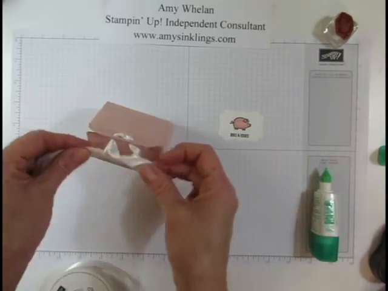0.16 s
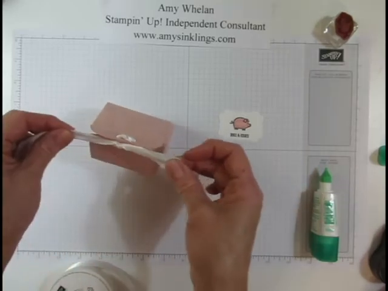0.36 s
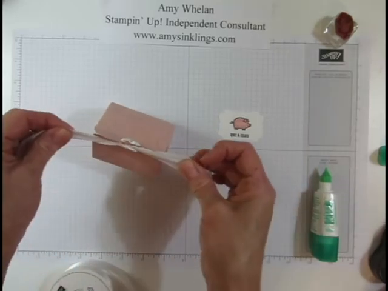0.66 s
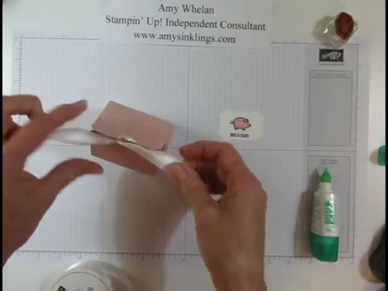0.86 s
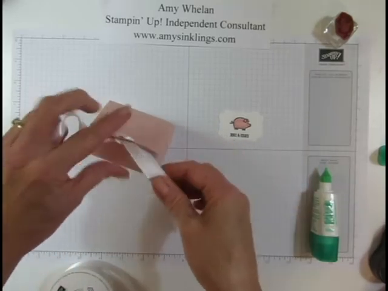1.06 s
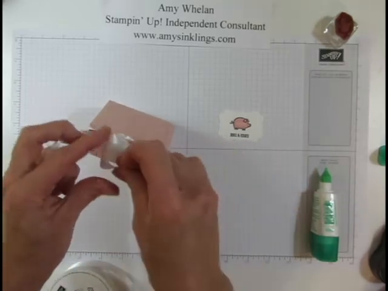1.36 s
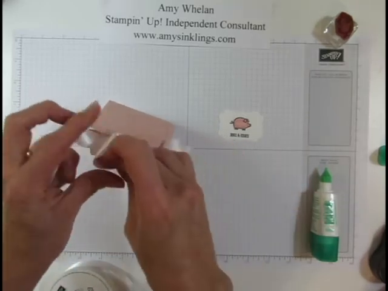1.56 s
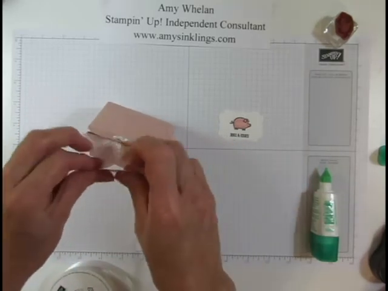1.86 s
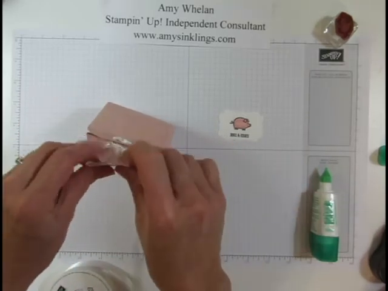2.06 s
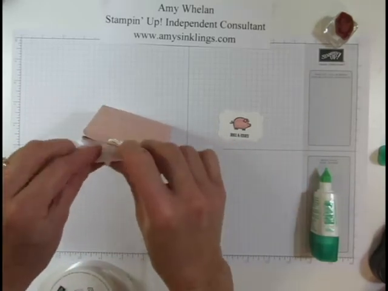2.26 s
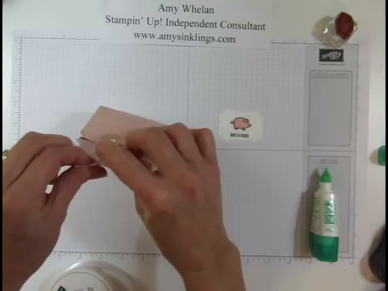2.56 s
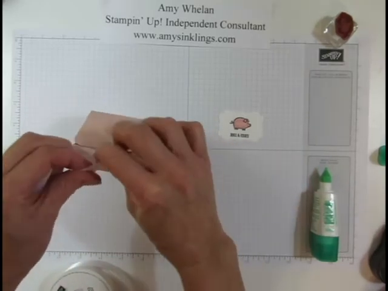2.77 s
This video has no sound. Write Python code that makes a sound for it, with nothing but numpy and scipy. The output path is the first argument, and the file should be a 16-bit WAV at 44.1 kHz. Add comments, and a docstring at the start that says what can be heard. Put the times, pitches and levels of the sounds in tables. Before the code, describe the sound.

Ribbon being tied round a small cardstock box: soft brushing, crisp ticks, low room hum

```python
"""Ribbon tied round a small box

At a desk in a room, close under a camera's microphone, hands tie a satin ribbon round a cardstock box.
The ribbon brushes and rasps: grains and noise swell with each stroke and ring card and satin.
Fingers knock and tick: short bursts of noise ring the modes of the box.
Behind, a mains hum beats twice a second against a motor tone, summed from steady cosines;
the steady hiss of the room is noise shaped in the middle and at the sides."""
import sys
import numpy as np
from scipy import signal
from scipy.fft import rfft, irfft
from scipy.io import wavfile
from scipy.ndimage import uniform_filter1d

SR = 44100
rng = np.random.default_rng(int(sys.argv[2]) if len(sys.argv) > 2 else 0)


def ratio_of_db(decibels):
    """Turn decibels (scalar or array-like) into linear amplitude factors; 0 dB maps to 1."""
    return 10 ** (np.asarray(decibels, float) / 20)


def dump(signal):
    """Clip the signal to [-1, 1] and save it as 16-bit WAV at the path in sys.argv[1]."""
    limited = np.clip(np.atleast_2d(signal).T, -1, 1)
    pcm = np.round(limited * 32767).astype(np.int16)
    wavfile.write(sys.argv[1], SR, pcm)


N = 127890  # length in samples

# Strokes of ribbon or finger: (start [s], rise [s], hold [s], card boom [dB], rasp [dB], satin hiss [dB])
STROKES = [(0.087, 0.026, 0.063, -59, -50.5, -49.5), (0.181, 0.0058, .006, -60, -48, -46),
           (.17, .12, 0.061, -52.5, -46, -52), (0.367, 0.054, 0.033, -49.5, -42, -43.5),
           (0.461, 0.0092, 0.0066, -48.5, -46, -46), (0.464, 0.025, 0.036, -51, -48.5, -60),
           (0.574, .006, 0.023, -60, -52, -54), (.662, 0.0072, .022, -44.5, -46.5, -50),
           (.768, 0.0034, 0.0086, -47, -44.5, -48.5), (.79, .005, .01, -63, -49, -59),
           (0.816, 0.0055, .008, -56, -45.5, -52), (.837, .008, 0.01, -44, -35, -32.5),
           (0.855, 0.0041, 0.03, -48, -47, -46), (0.917, 0.0046, 0.013, -55, -54, -54),
           (0.995, 0.0026, 0.013, -51, -47, -55), (1.076, 0.0026, 0.0067, -50, -45, -54),
           (1.089, 0.0047, .008, -43.5, -44.5, -46), (1.251, 0.011, 0.022, -54, -54, -55.5),
           (1.296, 0.036, 0.048, -53.5, -52.5, -50.5), (1.567, 0.028, 0.018, -68, -54.5, -53.5),
           (1.735, 0.0052, 0.022, -58, -56.5, -51), (2.038, 0.02, 0.022, -56, -60, -53),
           (2.115, .015, 0.015, -62, -60, -58), (2.313, 0.0032, 0.03, -36.5, -36.5, -42),
           (2.328, .012, 0.0014, -34, -31.5, -34), (2.349, 0.0058, 0.023, -42.5, -50, -50),
           (2.458, 0.0027, 0.019, -53.5, -50, -67), (2.537, 0.0054, 0.0097, -45.5, -40, -44.5),
           (2.612, 0.01, 0.027, -44, -47, -56), (2.663, .008, 0.036, -47.5, -50, -54),
           (2.718, .004, 0.026, -42.5, -45.5, -54), (2.763, 0.0083, 0.031, -45.5, -42, -48.5),
           (2.801, 0.0018, 0.0085, -36, -34, -30.5), (2.809, 0.0063, 0.018, -41, -49, -52),
           (2.829, .01, .04, -48, -54, -54), (2.882, .008, .02, -64, -44, -51)]
# Resonances of each part of a stroke: (frequency [Hz], width [Hz], relative level [dB])
CARD_BOOM = [(450, 174, 1.5), (650, 205, -2.5), (980, 210, -3.5), (1265, 350, 4.5)]
CARD_RASP = [(2170, 590, 1.5), (2810, 570, 4), (3630, 1340, 0.5), (4176, 900, 4.5), (5500, 1900, -5)]
SATIN_HISS = [(6670, 3650, 0.5), (8900, 5100, 0.5), (10200, 4700, 1)]
# Knocks and ticks on the box, before the room:
# (time [s], peak [dB], favoured pitch [Hz], loss one octave away [dB], its sign ignored)
KNOCKS = [(0.187, -37.5, 5030, 17), (0.313, -33, 3800, 19), (.325, -39, 5000, 12), (0.466, -29.5, 8000, 9),
          (.771, -41, 2200, 1), (.779, -38, 2700, 14), (0.826, -35, 5500, 13), (.837, -16, 4470, 29),
          (.845, -23, 9000, 13), (0.851, -24.5, 4340, 14), (.93, -32.5, 2300, 17), (1.0, -32.5, 2900, 4),
          (1.083, -35, 2700, 8), (1.097, -32, 650, 15), (1.099, -34, 2700, -4), (2.3042, -18, 760, 9),
          (2.322, -30, 450, 9), (2.343, -20, 2780, 16), (2.461, -31, 500, 13), (2.542, -36, 3000, 2),
          (2.615, -31.5, 497, 18), (2.647, -31.5, 1250, 6), (2.723, -40, 2200, 5), (2.803, -16, 1020, 1.5),
          (2.808, -10.5, 2500, 3.5), (2.814, -18, 1260, 13), (2.825, -30, 1100, 7), (2.856, -34, 800, 24)]
# Modes of the box, before scatter: (frequency [Hz], relative level [dB], time to fall 60 dB [s])
BOX_MODES = [(240, -12, .05), (410, -4, .06), (620, -1, .05), (800, 0, .09), (980, -1, .035),
             (1250, 0, .055), (1700, -8, .02), (2250, 0, .028), (2750, 0, .022), (3600, -1, .016),
             (4200, 0, .018), (5600, -3, .012), (6400, -4, .012), (8300, -4, .01), (10000, -6, .008)]
# Stereo width of the near sounds: (frequency [Hz], side minus mid [dB])
NEAR_WIDTH = [(60, -32), (300, -3), (1000, -18), (2500, -20.5), (4000, -16.5), (7500, -6.5), (13000, -1.5)]
# Steady tones, one entry each: (frequency [Hz])
HUM_HZ = [119.99, 117.99, 235.85, 87.06, 174.03, 52.4]
# The same tones in order: (mid rms [dB], side minus mid [dB])
HUM_LEVELS = [(-43, -36), (-51.5, -28), (-60.5, -6), (-62, -18), (-61.5, -12), (-63.5, -23)]
# Spectral shape of the room hiss, middle then sides: (frequency [Hz], relative level [dB])
HISS_MID_SHAPE = [(12, -56), (30, -13), (52, -1), (70, -4.5), (150, -2), (200, -7.5), (300, -8),
                  (600, -11.5), (1200, -13), (1700, -15.5), (2800, -16), (6000, -21.5), (9000, -27),
                  (12000, -32.5), (14000, -49)]
HISS_SIDE_SHAPE = [(12, -58), (30, -30), (100, -5), (200, -2.5), (400, -3.5), (650, -7.5), (1440, -17),
                   (3000, -24), (5500, -27), (9000, -30), (12000, -35), (14000, -48)]

GRAINS_PER_S, GRAIN_SPREAD_DB = 2500, 3.8
SMOOTH_SHARE = .4  # share of the stroke drive's power that is smooth noise
FADE_S = 0.015  # a stroke dies by 20 dB in this time
MODE_SCATTER_DB, MODE_DETUNE = 2., .015  # chance spread of each mode's level and (as a fraction) pitch
CONTACT_S = .0008  # time in which the contact rattle falls to 1/e
RING_SAMPLES = 4000
BASS_CUT_HZ = 193  # the small box radiates no deep bass
ROOM_T60_S, ROOM_DB = 0.28, -16.5
SIDE_T60_S = .03
ECHO_DULL_HZ = 9000
BEAT_TOP_S = .2  # the two strongest tones first add up here
HISS_MID_DB, HISS_SIDE_DB = -46.5, -45.5  # rms
MIC_EDGE_HZ = 13700


def read(points, hz):
    """Value of a (Hz, value) table on a log-frequency axis."""
    f, value = np.transpose(points)
    return np.interp(np.log(hz + 1), np.log(f + 1), value)


def evened(x):
    """Scales to rms 1."""
    return x / np.sqrt(np.mean(x ** 2) + 1e-20)


def coloured(x, points):
    """Filters x by a (Hz, dB) table."""
    gain = ratio_of_db(read(points, np.fft.rfftfreq(N, 1 / SR)))
    return irfft(rfft(x) * gain, N)


def resonate(x, peaks):
    """Sum of resonances, each applied twice for steep skirts, with alternating sign."""
    out = 0
    for k, (hz, width, db) in enumerate(peaks):
        b, a = signal.iirpeak(hz, hz / width, SR)
        twice = signal.lfilter(b, a, signal.lfilter(b, a, x))
        out = out + (-1) ** k * ratio_of_db(db) * twice
    return out


def strokes():
    """Fibres catch and slip: dense grains plus smooth noise, swelling with each stroke, ring card and satin."""
    t = np.arange(N) / SR
    power = np.zeros((3, N))  # boom, rasp and satin hiss
    for start, rise, hold, *levels_db in STROKES:
        since = t - start
        fade = ratio_of_db(-20 * np.clip(since - rise - hold, 0, None) / FADE_S)
        shape = np.clip(since / rise, 0, 1) * fade
        power += (ratio_of_db(np.array(levels_db))[:, None] * shape) ** 2

    size = ratio_of_db(GRAIN_SPREAD_DB * np.minimum(rng.exponential(1, N), 4))
    size = size * rng.choice([-1., 1.], N)
    grains = evened(size * (rng.random(N) < GRAINS_PER_S / SR))
    smooth = rng.standard_normal((3, N))
    # the three parts share their grains but not their smooth noise
    drive = np.sqrt(1 - SMOOTH_SHARE) * grains + np.sqrt(SMOOTH_SHARE) * smooth

    out = np.zeros(N)
    for peaks, d, swell in zip((CARD_BOOM, CARD_RASP, SATIN_HISS), drive, np.sqrt(power)):
        out += resonate(d * swell, peaks) / np.std(resonate(d, peaks))
    return out


def knocks():
    """Each blow is a short rattle of contact that rings the modes of the box nearest its own pitch."""
    out = np.zeros(N + RING_SAMPLES)
    t = np.arange(RING_SAMPLES) / SR
    mode_hz, mode_db, t60 = np.transpose(BOX_MODES)[:, :, None]
    chances = rng.standard_normal((len(KNOCKS), len(BOX_MODES), 1))
    rattles = rng.standard_normal((len(KNOCKS), RING_SAMPLES)) * np.exp(-t / CONTACT_S)
    bass_cut = signal.butter(2, BASS_CUT_HZ, "high", fs=SR)
    for (start, peak_db, pitch_hz, loss_db), chance, rattle in zip(KNOCKS, chances, rattles):
        octaves = np.log2(mode_hz / pitch_hz)
        level_db = mode_db - abs(loss_db) * octaves ** 2 + MODE_SCATTER_DB * chance
        # the same draws in reverse order shift the pitches
        struck_hz = mode_hz * (1 + MODE_DETUNE * chance[::-1])
        modes = ratio_of_db(level_db - 60 * t / t60) * np.sin(2 * np.pi * struck_hz * t)
        ring = signal.fftconvolve(modes.sum(0), rattle)[:RING_SAMPLES]
        ring = signal.lfilter(*bass_cut, ring)
        out[round(start * SR):][:RING_SAMPLES] += ratio_of_db(peak_db) * ring / abs(ring).max()
    return out[:N]


def echoes(x, t60):
    """Reflections as dense dying random taps of energy 1, dulled in the treble."""
    t = np.arange(SR // 2) / SR
    taps = rng.standard_normal(len(t)) * (t > .0003) * ratio_of_db(-60 * t / t60)
    taps = signal.lfilter(*signal.butter(1, ECHO_DULL_HZ, fs=SR), taps)
    return signal.fftconvolve(x, taps / np.linalg.norm(taps))[:N]


def hum():
    """Steady mains and motor tones, stronger in mid than side; close pitches beat. Returns mid and side."""
    t = np.arange(N) / SR - BEAT_TOP_S
    tones = np.sqrt(2) * np.cos(2 * np.pi * np.outer(HUM_HZ, t))  # each of rms 1
    mid_db, side_db = np.transpose(HUM_LEVELS)
    return np.array([ratio_of_db(mid_db) @ tones, ratio_of_db(mid_db + side_db) @ tones])


def hiss():
    """Smooth room noise with faint drifting patches in time and pitch; returns mid and side."""
    frames = dict(nperseg=1024, noverlap=768)
    _, _, z = signal.stft(rng.standard_normal((2, N)), SR, **frames)
    patches = uniform_filter1d(rng.standard_normal(z.shape[1:]), 12, 0)  # over frequency
    patches = evened(uniform_filter1d(patches, 14, 1))  # over time
    _, noise = signal.istft(z * ratio_of_db(1.2 * patches), SR, **frames)  # patches of 1.2 dB rms
    mid, side = noise[:, :N]
    return np.array([ratio_of_db(HISS_MID_DB) * evened(coloured(mid, HISS_MID_SHAPE)),
                     ratio_of_db(HISS_SIDE_DB) * evened(coloured(side, HISS_SIDE_SHAPE))])


def scene():
    """Near sounds with the room's tail, widened by reflections off the desk, over hum and hiss."""
    near = strokes() + knocks()
    near = near + ratio_of_db(ROOM_DB) * echoes(near, ROOM_T60_S)
    near_side = coloured(echoes(near, SIDE_T60_S), NEAR_WIDTH)
    mid, side = hum() + hiss() + np.array([near, near_side])
    return np.array([mid + side, mid - side])


def top_cut(x):
    """Nothing passes above the cut-off."""
    return signal.sosfilt(signal.butter(12, 14190, fs=SR, output="sos"), x)


def record(dry):
    """The camera's microphone passes no treble above its band limit."""
    edge = signal.butter(8, MIC_EDGE_HZ, fs=SR, output="sos")
    mix = signal.sosfiltfilt(edge, dry)
    return top_cut(mix)


dry = scene()
out = record(dry)
dump(out)
```